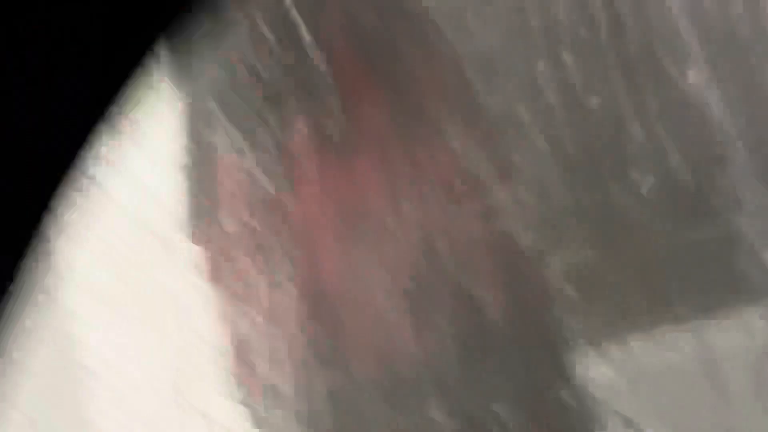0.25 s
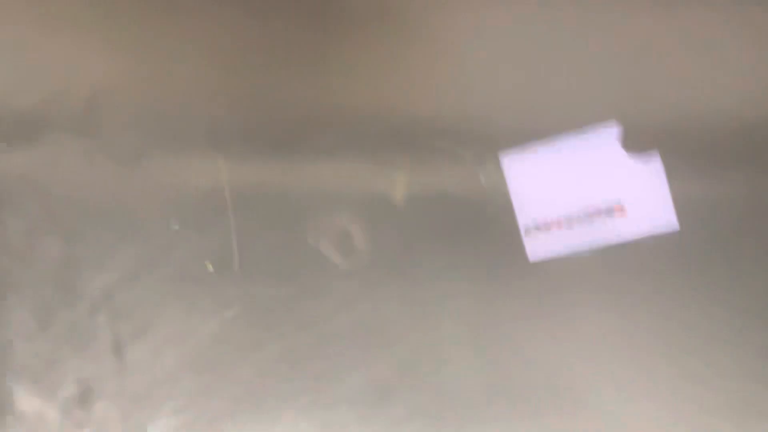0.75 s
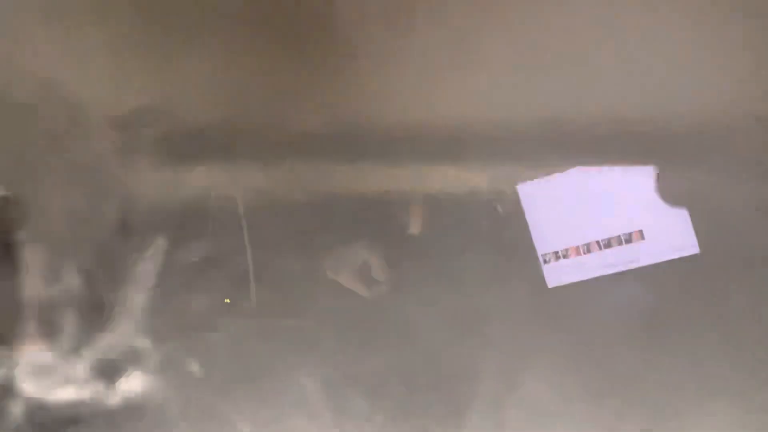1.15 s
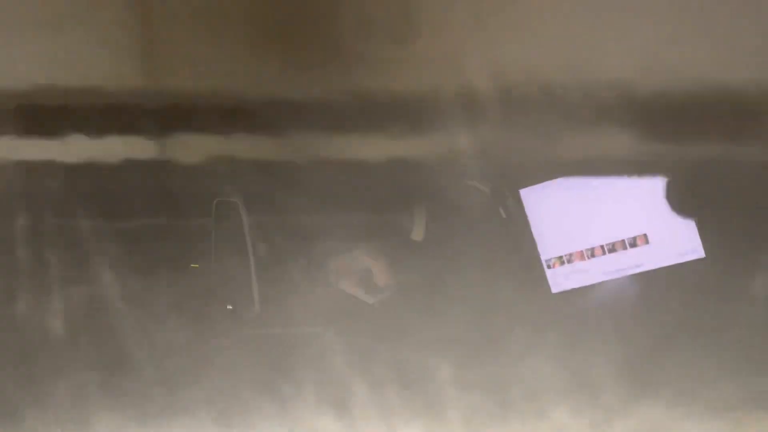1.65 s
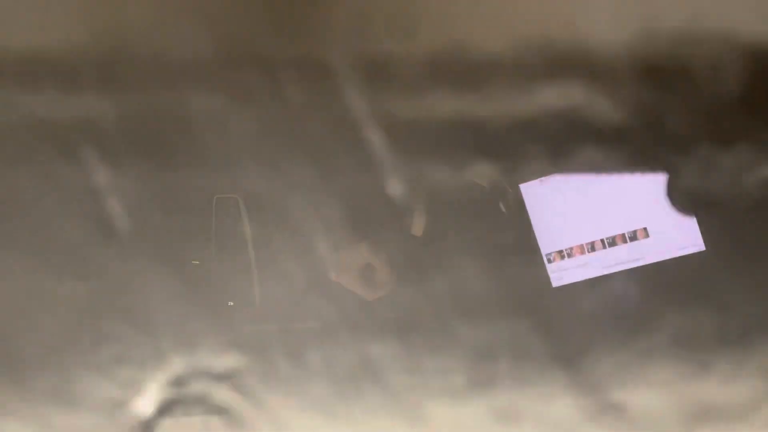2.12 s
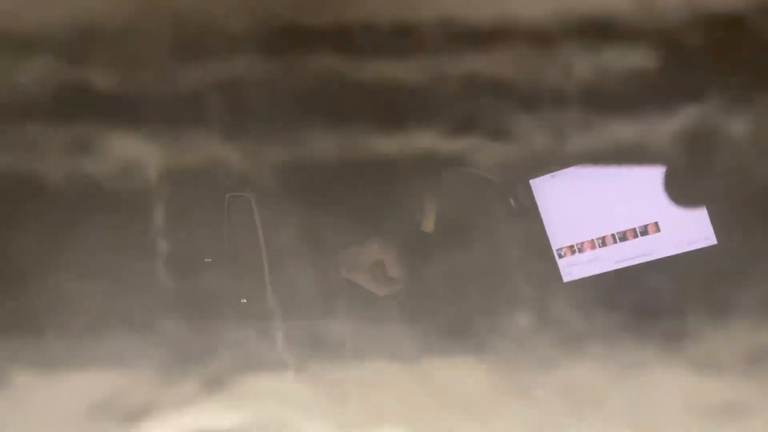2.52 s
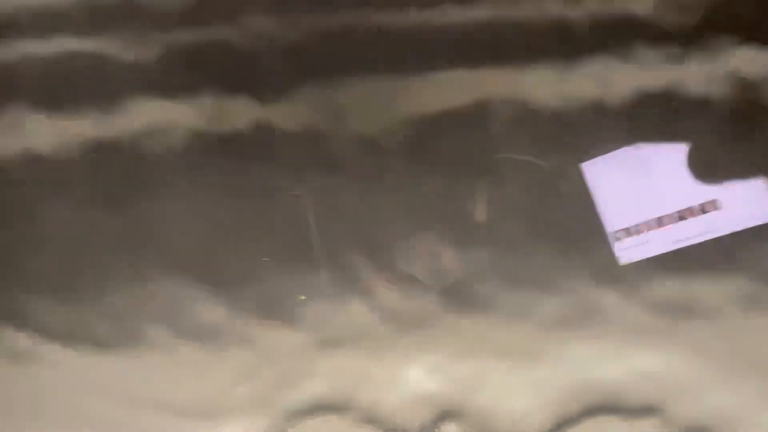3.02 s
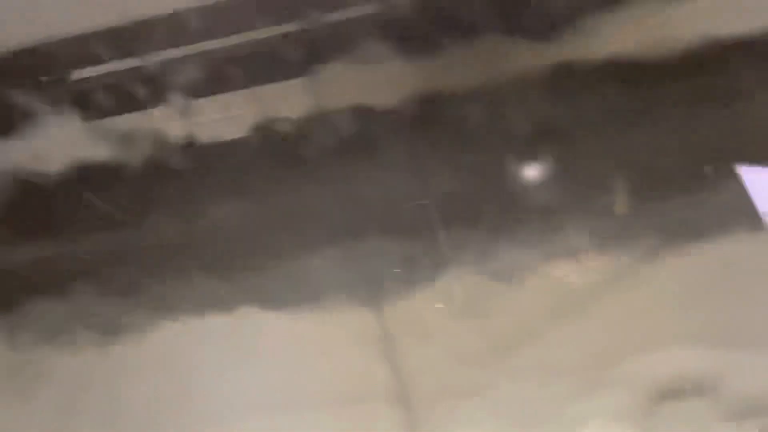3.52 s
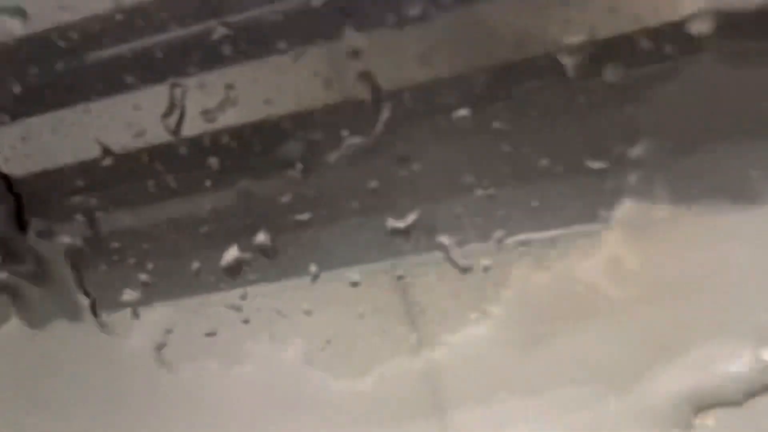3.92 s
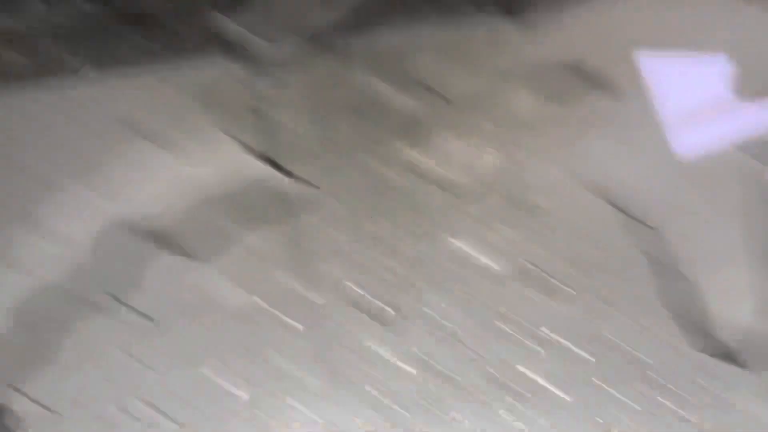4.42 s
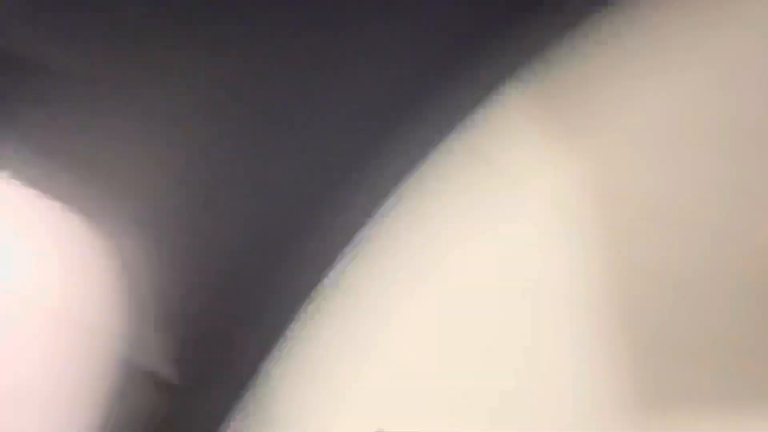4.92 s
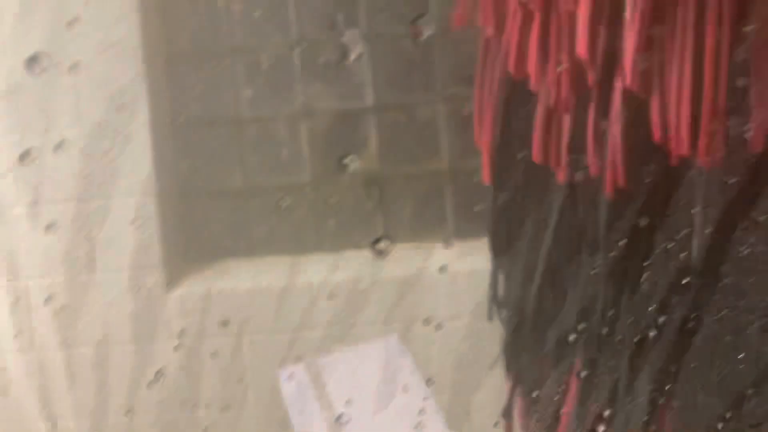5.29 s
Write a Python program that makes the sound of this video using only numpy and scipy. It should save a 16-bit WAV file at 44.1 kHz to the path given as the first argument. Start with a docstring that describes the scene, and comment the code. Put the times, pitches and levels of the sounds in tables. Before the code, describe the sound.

Heard from inside a car in an automatic wash. A brush drags past with a full low roar, shaking and dull thumps for half a second; then a bright water jet hisses on the glass, fluttering rapidly, over a fainter motor hum and pump drone. Near the end the jet passes unevenly and falls away, leaving muffled splash and a few soft thumps. Wide stereo, close cabin microphone.

```python
"""Inside a car wash

Spinning nozzles sweep the car's glass with a throbbing hiss: noise in bands that swell together.
The wider splash of the bay, smoother noise, roars through the panels. A motor and a pump hum
unevenly underneath as sums of waves, while the body shakes (low noise) and thumps (short low rings).
Left and right differ by pitch: how alike they are, which one leads and which one is louder."""
import sys
import numpy as np
from scipy import signal
from scipy.fft import rfft, irfft
from scipy.io import wavfile
from scipy.ndimage import uniform_filter1d

SR = 44100
rng = np.random.default_rng(int(sys.argv[2]) if len(sys.argv) > 2 else 0)


def generate_wav(sig):
    """Save sig (samples, or channels by samples) to the path in sys.argv[1] as 16-bit PCM at SR."""
    pcm = np.round(np.clip(np.atleast_2d(sig).T, -1, 1) * 32767).astype(np.int16)
    wavfile.write(sys.argv[1], SR, pcm)


N = 244755

# Motor hum over time; the tilt favours high multiples and pivots at the fourth:
# start_s, level_db, tilt_db_per_octave
HUM_CURVE = [(0, -21, -1), (.2, -24, 2), (.43, -26, -2), (.6, -27.5, 9), (.73, -29, 0), (.8, -33, 1),
             (.97, -35, 5), (1.08, -38, 11), (1.3, -35.5, 1), (2.0, -34, 7), (2.5, -33.5, 7),
             (3.0, -31.5, 0.5), (3.4, -35, -3.5), (3.65, -31, -7), (3.82, -35, 6), (4.1, -31.5, -2),
             (4.6, -32.5, -1), (4.82, -32.5, -2), (5.05, -33, -6), (5.3, -32, -1), (5.55, -29, -1)]
# Waves that make up the motor hum: multiple_of_beat, relative_level_db
HUM_MULTIPLES = [(2, -5.5), (3, 2.5), (4, 0.5), (5, -4.5), (6, -11), (7, -12.5), (8, -13), (10, -11.5)]
# Loudness of the pump's drone: start_s, level_db
PUMP_CURVE = [(0, -30), (.5, -33), (.9, -30.5), (1.2, -43), (1.6, -40), (2.4, -34), (3.1, -38), (3.5, -37),
              (3.95, -36), (4.5, -41.5), (5.0, -41), (5.55, -39)]
# Loudness of the body's shaking: start_s, level_db
SHAKE_CURVE = [(0, -24.5), (.55, -28), (1.1, -44.5), (4.4, -42.5), (5.0, -39), (5.55, -32)]
# Tone of the shaking: frequency_hz, relative_density_db
SHAKE_TONE = [(15, -40), (29, -14), (42, 5), (55, 2), (68, -11), (100, -14), (160, -14.5), (300, -28),
              (800, -62), (3000, -120)]
# Brief changes in the shaking, swelling where positive and dipping where negative: time_s, change_db
SHAKE_CHANGES = [(.08, -3), (.24, -3), (2.6, 10), (5.36, 1.5)]
# Low thumps through the body: start_s, envelope_peak_db, pitch_hz
BODY_THUMPS = [(0.01, -13, 74), (.058, -19, 62), (0.123, -16, 70.4), (0.211, -15, 99), (0.244, -21, 109),
               (0.279, -18.5, 138), (0.159, -17, 80), (0.299, -21, 99), (0.333, -27, 111),
               (0.395, -20, 101), (0.442, -12, 111), (0.507, -12, 55.7), (0.536, -16, 59.6),
               (0.704, -20, 85), (2.48, -25, 108), (2.514, -32, 95), (2.958, -26, 97), (3.259, -28, 76),
               (4.7, -30, 98), (4.806, -21, 78), (4.845, -26, 90.5), (5.027, -32, 90), (5.227, -21, 85),
               (5.27, -24, 100), (5.335, -28, 60), (5.49, -24, 95)]
# Splash through the panels; brightness pivots at 500 Hz, the hollow is a dip in the low middle
# (a bump where negative): start_s, level_db, brightness_db_per_octave, hollow_db
SPLASH_CURVE = [(0.0, -19.5, 0.5, 1), (0.08, -22, 1, -2.5), (0.4, -21, .5, 1), (0.52, -19, 0, -8),
                (0.6, -21, 0.5, -5.5), (0.8, -23.5, 0, -4.5), (1.34, -26, 0, -2), (2.3, -29.5, 0.5, -3.5),
                (4.5, -29, 0, -5.5), (4.9, -33.5, .5, -1.5), (5.1, -32, 0, 3.5), (5.2, -29.5, 0, 4),
                (5.3, -31, 0, 2.5), (5.55, -31, 0.5, -2.5)]
# Tone of the splash: frequency_hz, relative_density_db
SPLASH_TONE = [(60, -8), (130, 3.5), (200, 0), (300, 1), (600, -6), (1300, -2.5), (2400, -7.5), (4500, -12),
               (5500, -15.5), (6500, -16.5), (9000, -21.5), (10800, -21.5), (12500, -21), (15700, 3)]
# Tone the nearby brush lends the splash until it draws off: frequency_hz, gain_db
BRUSH_TONE = [(60, 0), (150, 6.5), (260, 4.5), (450, -1.5), (800, 1), (1200, 2), (1700, -1), (2500, -0.5),
              (3500, 2.5), (6000, -0.5), (12000, 3)]
# Jet on the glass; brightness counts above 2 kHz: start_s, level_db, brightness_db_per_octave
JET_CURVE = [(0.36, -51, 1), (0.45, -35, 7.5), (0.54, -23.5, 2.5), (0.73, -20.5, 3), (0.76, -22.5, 2.5),
             (0.97, -19, 1), (1.39, -21.5, 1), (2.81, -19.5, -0.5), (3.25, -21.5, 1), (4.3, -25, 0),
             (4.6, -27, 0), (4.7, -35.5, -1), (4.85, -43, -6.5), (5.1, -56, 1.5)]
# Tone of the jet: frequency_hz, relative_density_db
JET_TONE = [(150, -45), (500, -2), (1200, -2.5), (2000, -0.5), (2700, 0.5), (3600, 1), (5200, -3),
            (5550, -9.5), (6000, -4), (8300, -3.5), (10500, -2.5), (13400, -7.5), (14600, -5.5),
            (15700, -36)]
# Nozzle sweep, with throb depth before each band's weighting and lag behind a steady beat:
# start_s, throb_depth_db, lag_ms
SWEEP_CURVE = [(.5, 3.5, 64), (.72, 2.5, 47.5), (.85, 0.5, 57), (1.15, -0.5, 21), (1.5, 1.5, 10),
               (2.1, 0.5, 4.4), (2.25, -1, 15), (2.55, 2, 16), (2.95, -0.5, 4), (3.9, 1.5, 7.4),
               (4.05, -0.5, 19), (4.2, 3.5, 13), (4.4, 1, 10), (4.6, 4.5, 7.7)]
# Single nozzle passes, strong and faint, one a dip where negative; sizes are before weighting:
# time_s, change_db, strongest_pitch_hz
NOZZLE_PASSES = [(0.08, 11, 3000), (0.464, 2, 3300), (0.495, 4.5, 4500), (0.525, 12.5, 2500),
                 (0.562, 5.5, 4100), (0.602, 1, 2520), (0.65, 2.5, 3500), (0.682, 1, 4500),
                 (0.718, 3, 3000), (0.917, 5, 2500), (1.249, 5, 3000), (1.878, 1.5, 3000), (2.069, 3, 3500),
                 (2.2, 4, 3000), (3.105, 3.5, 3400), (3.697, 2.5, 3020), (4.103, 4, 3300),
                 (4.145, 4.5, 4500), (4.178, 3.5, 3460), (4.215, 0, 4200), (4.25, 3, 2900),
                 (4.296, 1, 2700), (4.376, 4.5, 3200), (4.41, 2, 3430), (4.452, 2.5, 3300),
                 (4.496, 3.5, 3220), (4.512, 1, 1700), (4.536, 1, 2600), (4.568, 1, 4000),
                 (4.608, -4, 2900)]
# Broad ring that follows the struck spot over the glass (a dip where negative):
# start_s, pitch_hz, lift_db
GLASS_RING = [(.4, 3370, 8), (.75, 2460, 4), (1.3, 2340, 1.5), (1.9, 2680, 1.5), (2.6, 3080, 0.5),
              (3.3, 3320, 3), (4.0, 3320, 2), (4.35, 3200, 1), (4.6, 2820, -2.5), (4.9, 2600, -3)]
# Narrow rings of the pane, lifted while the water is near (dipped where negative), some sliding:
# pitch_hz, width_hz, lift_db, strongest_at_s, lasts_s, glide_hz_per_s
PANE_RINGS = [(1800, 75, 6.5, 4.42, 0.1, -2200), (2240, 60, 3.5, 1.3, 0.75, 0),
              (2450, 52, 4, 3.85, 0.39, 0), (2920, 70, 3, 3.64, 1, 0), (3600, 98, 4, 3.75, 0.16, 3),
              (3480, 110, 3, 4.1, 0.12, -300), (3260, 260, 5.5, 4.5, 0.13, -2200),
              (3300, 120, 0.5, 2.84, 0.26, 608), (3940, 92, 1.5, 2.2, 0.6, 0),
              (4600, 120, 3, 4.18, 0.054, 0), (4400, 110, -7, 2.8, 0.31, -300), (5500, 79, 4.5, 0.6, 1, 0),
              (5270, 110, 5, 4.9, 0.62, 0), (4400, 250, -4, 5.3, 0.27, -2), (3360, 150, 3, 5.5, 0.46, 0),
              (2430, 120, 3.5, 5.3, 0.38, 300)]
# Stereo by pitch: how alike left and right are, with their lead and level difference:
# frequency_hz, likeness_0_to_1, left_lead_rad, left_minus_right_db
STEREO_CURVE = [(40, .99, 0, 1), (90, .95, 0, 1), (220, .75, 0, 0), (400, .45, 0, -.5), (620, .15, .6, 0),
                (870, .3, 2.2, 1), (1450, .35, 4.1, 1), (2200, .6, 6.2, 2), (3050, .6, 7.4, 4),
                (3550, .5, 7.7, 4.5), (4100, .35, 7.4, 5), (4700, .6, 7.0, 5.5), (5300, .45, 6.7, 5),
                (5900, .35, 5.2, 3), (7100, .45, 4.5, 1), (7700, .85, 3.4, .5), (8250, .999, 3.17, 0),
                (9000, .999, 3.11, 0), (9500, .95, 2.9, 0), (10100, .75, 2.4, 0), (11300, .65, 1.4, 0),
                (12100, .85, .5, 0), (12450, .98, 0, 0), (13300, 1, 0, 0)]

MOTOR_HZ, BEAT_AT_S = 28.4, 4.817  # beats a second, and the time of one beat
BEAT_WAVER, HUM_SMEAR = 0.06, 0.07  # turns: of the whole beat, of each multiple
PUMP_HZ, PUMP_WAVER_HZ = 77.2, 1.56
HUM_SWAY_DB, SHAKE_SWAY_DB, SHAKE_CHANGE_S = 2.5, 1.5, 0.014
THUMP_RISE_MS, THUMP_FALL_MS = 6.6, 17
HOLLOW_HZ, HOLLOW_OCTAVES = 596, 0.35
BRUSH_LEAVES_S, BRUSH_FADE_S = 0.44, 0.1
SWEEPS_PER_S, DROP_SPREAD_DB = 25.2, 1.3
PASS_RISE_MS, PASS_FALL_MS = 2.9, 5.2
PASS_BROAD_SHARE, PASS_OCTAVES = 0.41, 0.76  # share felt at every pitch; width of the rest
BASS_CUT_HZ, CUTOFF_HZ = 29, 15735


def from_db(db):
    """Turn a level in dB into a gain."""
    return 10 ** (np.asarray(db) / 20)


def rms_one(x):
    """Scale a signal so its average strength (rms) is 1."""
    return x / np.sqrt(np.mean(x ** 2) + 1e-20)


def bell(distance):
    """Smooth bump that is 1 at distance 0 and fades on both sides."""
    return np.exp(-0.5 * distance ** 2)


def in_time(rows):
    """Draw each column of a time table as a curve with one value a sample."""
    s, *columns = np.transpose(rows)
    return [np.interp(np.arange(N) / SR, s, column) for column in columns]


def in_pitch(rows, size=N):
    """Draw each column of a frequency table as a curve with one value an FFT bin."""
    hz, *columns = np.transpose(rows)
    bin_hz = np.arange(size // 2 + 1) * SR / size
    return [np.interp(np.log(bin_hz + 1), np.log(hz), column) for column in columns]


def colour(x, tone):
    """Filter a sound by a tone table, then scale it to rms 1."""
    return rms_one(irfft(rfft(x) * from_db(in_pitch(tone)[0]), N))


def drift(rate_hz):
    """Slow random curve of spread 1: noise at every 40th sample, smoothed by two equal low-passes."""
    r = np.exp(-80 * np.pi * rate_hz / SR)
    noise = rng.standard_normal(N // 40 + 2002)
    slow = signal.lfilter([1], [1, -2 * r, r * r], noise)[2000:]  # skip the filter's start-up
    return np.interp(np.arange(N) / 40, np.arange(len(slow)), rms_one(slow))


def flutter(rate_hz):
    """Quick random curve: a drift with its slow part taken out."""
    x = drift(rate_hz)
    return x - uniform_filter1d(x, size=SR // 14)


def bands(source, low_hz, gain_db):
    """Split noise into overlapping bands half an octave apart that add up flat, and set each one's gain."""
    bin_hz = np.arange(N // 2 + 1) * SR / N
    steps = 2 * np.log2((bin_hz + 1) / low_hz)
    spectrum, out = rfft(source), 0
    for k in range(int(2 * np.log2(20000 / low_hz))):
        window = np.cos(np.pi / 2 * np.clip(steps - k, -1, 1)) ** 2
        centre_hz = low_hz * 2 ** (k / 2)
        out = out + irfft(spectrum * window, N) * from_db(gain_db(centre_hz))
    return out


def pass_changes(hz):
    """Single passes in dB at one pitch: quick to set in, slower to fade, with a counter-swing around."""
    marks, ms = np.zeros(N), np.arange(-1500, 1501) * 1000 / SR
    s, db, strongest_hz = np.transpose(NOZZLE_PASSES)
    near = bell(np.log2(hz / strongest_hz) / PASS_OCTAVES)
    marks[np.round(s * SR).astype(int)] = db * (PASS_BROAD_SHARE + (1 - PASS_BROAD_SHARE) * near)
    shape = bell(ms / np.where(ms < 0, PASS_RISE_MS, PASS_FALL_MS))
    bumps = signal.fftconvolve(marks, shape, "same")
    return bumps - uniform_filter1d(bumps, size=SR // 16)  # the local average is taken off


def motor():
    """Multiples of the motor's beat stay nearly in step, so they pulse, while each sways in level."""
    t, hum = np.arange(N) / SR, 0
    level_db, tilt_db = in_time(HUM_CURVE)
    beat = MOTOR_HZ * (t - BEAT_AT_S) + BEAT_WAVER * drift(1.53)
    for multiple, line_db in HUM_MULTIPLES:
        sway_db = tilt_db * np.log2(multiple / 4) + HUM_SWAY_DB * drift(6.9)
        turns = multiple * beat + HUM_SMEAR * drift(2.7)
        hum = hum + from_db(line_db + sway_db) * np.cos(2 * np.pi * turns)
    return from_db(level_db) * rms_one(hum)


def pump():
    """One sine wave drones with a pitch and a level that wander."""
    turns = np.cumsum(PUMP_HZ + PUMP_WAVER_HZ * drift(3.8)) / SR
    level_db = in_time(PUMP_CURVE)[0] + HUM_SWAY_DB * drift(11.0)
    return from_db(level_db) * np.sqrt(2) * np.sin(2 * np.pi * turns)


def shaking():
    """The body shakes as low noise whose level sways, with a few brief swells and dips."""
    t = np.arange(N) / SR
    level_db = in_time(SHAKE_CURVE)[0] + SHAKE_SWAY_DB * drift(4.2)
    for s, change_db in SHAKE_CHANGES:
        level_db = level_db + change_db * bell((t - s) / SHAKE_CHANGE_S)
    return from_db(level_db) * colour(rng.standard_normal((2, N)), SHAKE_TONE)


def rumble():
    """Motor and pump reach the second arrival an eighth of a second late; the shaking lies beneath."""
    steady = motor() + pump()
    now = np.arange(N)
    late = np.abs(now - SR // 8)  # the opening gap is filled with mirrored sound
    return steady[[now, late]] + shaking()


def thumps():
    """The body takes soft pushes that ring briefly and die away, in the first arrival only."""
    out, ms = np.zeros(N + SR), np.arange(SR // 8) * 1000 / SR
    shape = (1 - np.exp(-ms / THUMP_RISE_MS)) * np.exp(-ms / THUMP_FALL_MS)
    shape = shape / shape.max()
    for s, db, hz in BODY_THUMPS:
        start = round(s * SR)
        out[start:start + len(ms)] += from_db(db) * shape * np.sin(2 * np.pi * hz * ms / 1000)
    return out[:N] * [[1], [0]]


def splash():
    """Far spray and running water blend into smooth noise with slight patches."""
    level_db, bright, hollow_db = in_time(SPLASH_CURVE)
    together_db = 0.4 * drift(12.0)  # patches shared by all bands
    brush = np.clip((BRUSH_LEAVES_S - np.arange(N) / SR) / BRUSH_FADE_S, 0, 1)
    brush_hz, brush_db = np.transpose(BRUSH_TONE)

    def gain_db(hz):
        """Brightness, hollow, brush and patches of one band; the panels feel the nozzle passes too."""
        hollow = hollow_db * bell(np.log2(hz / HOLLOW_HZ) / HOLLOW_OCTAVES)
        tone = bright * np.log2(hz / 500) - hollow
        brush_tone = brush * np.interp(np.log(hz), np.log(brush_hz), brush_db)
        patches = 1.9 * min(1, (1500 / hz) ** 0.23) * drift(14.0)  # weaker in the treble
        return tone + brush_tone + together_db + 0.5 * pass_changes(hz) + patches

    noise = bands(rng.standard_normal((2, N)), 60.3, gain_db)
    return from_db(level_db) * colour(noise, SPLASH_TONE)


def jet():
    """Dense drops hiss on the glass; the nozzle passes change their level, with more weight in the treble."""
    t = np.arange(N) / SR
    level_db, bright = in_time(JET_CURVE)
    depth_db, lag_ms = in_time(SWEEP_CURVE)
    ring_hz, ring_db = in_time(GLASS_RING)
    turns = SWEEPS_PER_S * (t - lag_ms / 1000)
    drop_db = DROP_SPREAD_DB * np.minimum(rng.exponential(1, N), 5)  # drop sizes vary
    drops = rng.standard_normal((2, N)) * from_db(drop_db)
    gust = flutter(74.0)  # shared by all bands

    def gain_db(hz):
        """Throb, ring, brightness and flicker of one band; passes differ a little between bands."""
        octaves = np.log2(hz / 2000)
        sweep = depth_db * np.cos(2 * np.pi * (turns + 0.062 * drift(20.0)))
        throb = (pass_changes(hz) + sweep) * np.clip(1.03 + 0.075 * octaves, 0, 2)
        ring = ring_db * bell(np.log2(hz / ring_hz) / 0.51)
        flicker = 0.38 * gust + 1.92 * flutter(56.0)
        return ring + throb + bright * max(octaves, 0) + flicker

    first_s, last_s = JET_CURVE[0][0], JET_CURVE[-1][0]
    fade = np.clip(np.minimum(t - first_s, last_s - t) / 0.13, 0, 1)  # 0.13 s in and out
    return fade * from_db(level_db) * colour(bands(drops, 220.0, gain_db), JET_TONE)


def pane(x):
    """The glass rings in narrow bands, each picked out around its centre and lifted or dipped for a while."""
    t, hz, out = np.arange(N) / SR, np.fft.fftfreq(N, 1 / SR), x
    for centre_hz, width_hz, lift_db, s, lasts, glide in PANE_RINGS:
        lift = from_db(lift_db * bell((t - s) / lasts)) - 1
        slide_hz = glide * np.clip(t - s, -2 * lasts, 2 * lasts)
        turn = np.exp(2j * np.pi * np.cumsum(centre_hz + slide_hz) / SR)
        # shift the centre down to 0 Hz, keep what is close to it, shift back
        ring = np.fft.ifft(np.fft.fft(x / turn) * bell(hz / width_hz)) * turn
        out = out + lift * 2 * ring.real
    return out


def scene():
    """Mix all sources as two arrivals; left and right share the first by their likeness."""
    pad = SR // 10  # mirrored edges
    mix = rumble() + thumps() + pane(splash() + jet())
    first, second = rfft(np.pad(mix, ((0, 0), (pad, pad)), "reflect"))
    alike, lead, tilt_db = in_pitch(STEREO_CURVE, size=N + 2 * pad)
    alike = np.clip(alike, 0, 1)
    right = alike * np.exp(-1j * lead) * first + np.sqrt(1 - alike ** 2) * second
    sides = [first * from_db(tilt_db / 2), right * from_db(-tilt_db / 2)]
    return irfft(sides, N + 2 * pad)[:, pad:pad + N]


def record(dry):
    """The microphones lose the deepest bass, and a steep filter cuts the top."""
    bass_cut = signal.butter(2, BASS_CUT_HZ, "high", fs=SR, output="sos")
    top_cut = signal.ellip(12, 0.5, 70, CUTOFF_HZ, fs=SR, output="sos")
    return signal.sosfilt(top_cut, signal.sosfilt(bass_cut, dry))


dry = scene()
out = record(dry)
generate_wav(out)
```